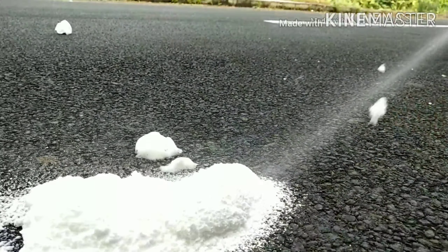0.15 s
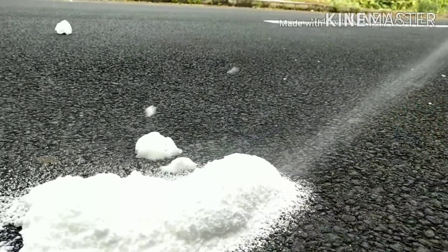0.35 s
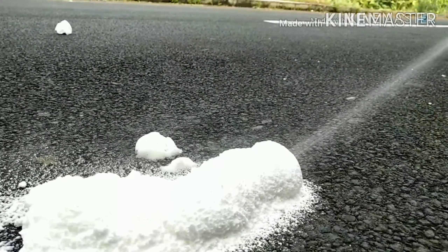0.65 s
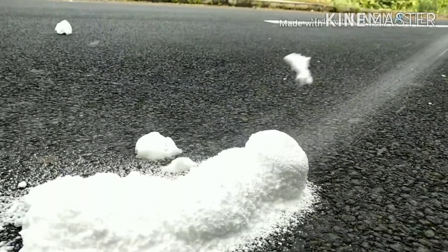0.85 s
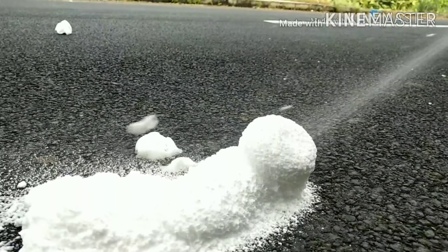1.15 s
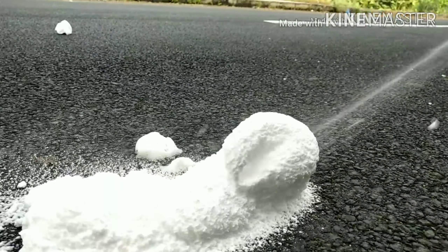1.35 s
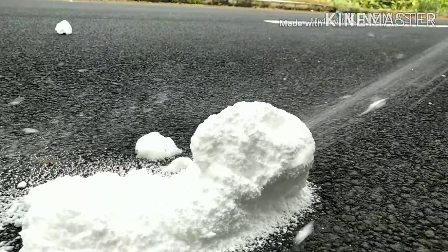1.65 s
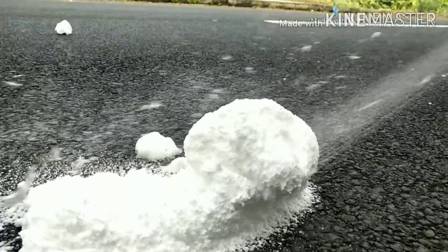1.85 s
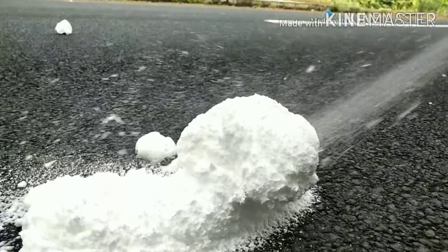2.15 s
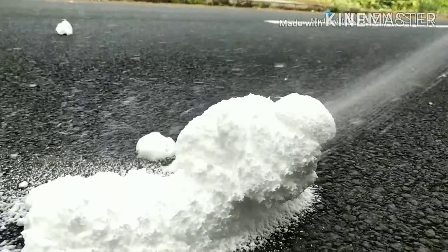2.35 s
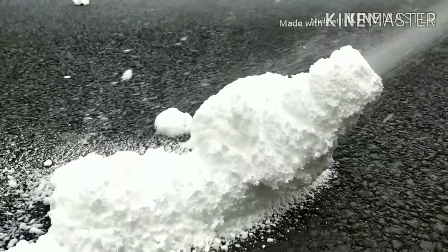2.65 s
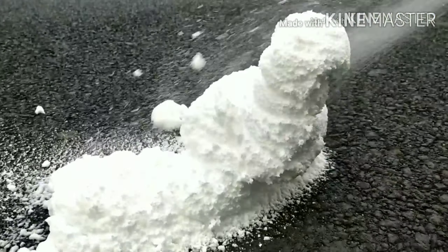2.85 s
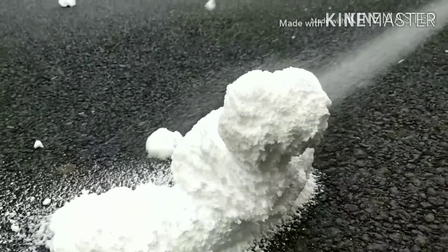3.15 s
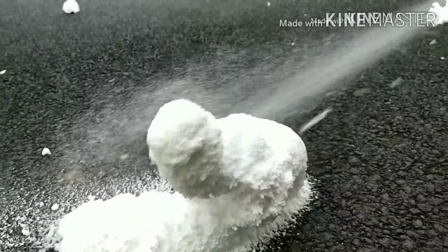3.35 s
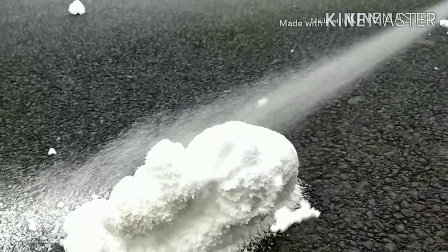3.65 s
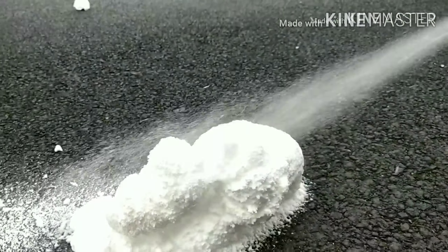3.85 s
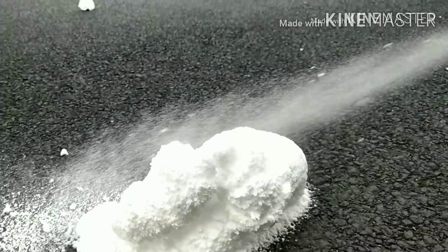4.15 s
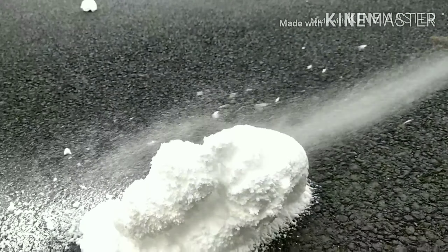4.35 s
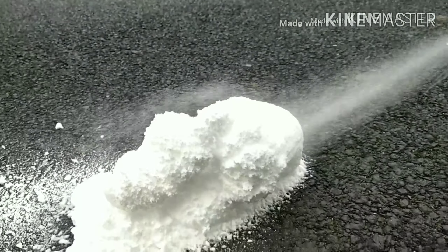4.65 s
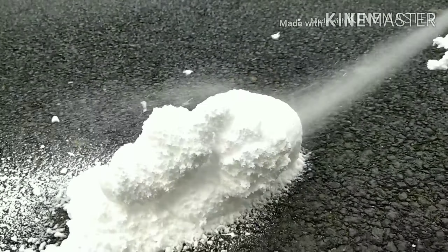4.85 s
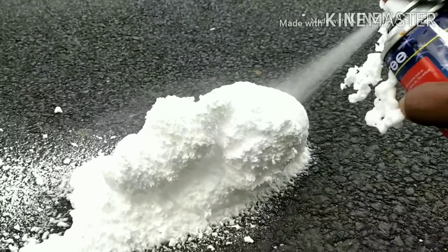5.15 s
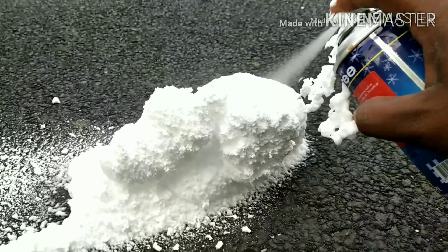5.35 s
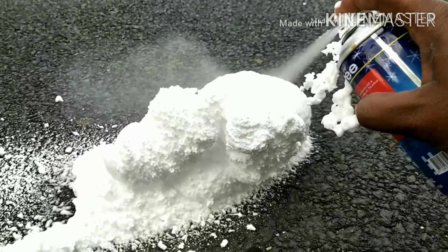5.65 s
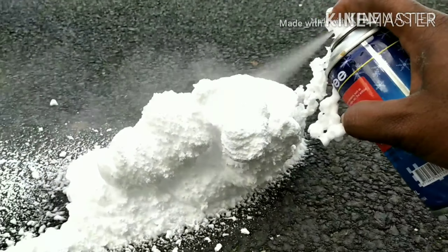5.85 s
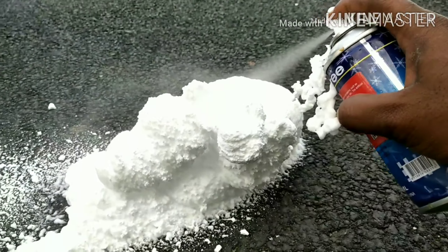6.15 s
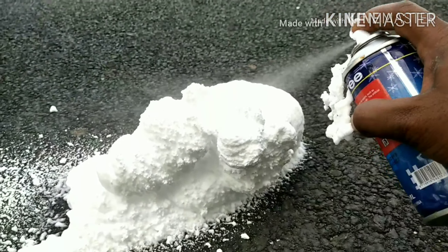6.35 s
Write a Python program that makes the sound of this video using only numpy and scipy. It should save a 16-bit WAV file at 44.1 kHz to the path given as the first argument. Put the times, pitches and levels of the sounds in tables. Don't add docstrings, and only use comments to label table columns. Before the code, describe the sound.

Close outdoor pickup of an aerosol can spraying foam onto a road. For two seconds the jet bores into the heap with a hollow, bubbling roar, quick gulps and wet splashes, stuttering near the end. Then it skims the top and becomes a smooth, bright, piercing hiss with soft airy mist. Distant traffic rumbles low throughout, and the hiss holds to the end.

```python
import sys
import numpy as np
from scipy import signal
from scipy.io import wavfile
from scipy.ndimage import uniform_filter1d

SR = 44100
rng = np.random.default_rng(int(sys.argv[2]) if len(sys.argv) > 2 else 0)


def generate_wav(sig):
    pcm = np.round(np.clip(np.atleast_2d(sig).T, -1, 1) * 32767).astype(np.int16)
    wavfile.write(sys.argv[1], SR, pcm)


def to_linear_factor(level_db):
    exponent = np.asarray(level_db, float) / 20
    return 10 ** exponent


N = 287022
SIZE, HOP = 1024, 256
HZ = np.fft.rfftfreq(SIZE, 1 / SR)[:, None]
T = np.arange(N // HOP + 2) * HOP / SR

# time in seconds, bite in dB.
BITE = [(0, -5), (.22, -3.5), (1.1, 3.5), (1.8, 3), (2.12, 4.5), (2.36, -8.5), (2.55, -20), (2.7, -18.5),
        (2.9, -25.5), (3.08, -43), (3.2, -36.5), (3.36, -48), (3.62, -60), (3.9, -95)]
# level at full bite in dB, bite lost before it fades in dB, share of further loss.
IMPACT_LAYERS = [
    (-20.5, -0.5, 0.92),
    (-24, 10.5, 0.52),
    (-21.5, 16, 0.47),
]
# time in seconds, half length in seconds, bite lost in dB, hiss freed in dB.
SLIPS = [
    (1.24, 0.072, 9.5, -1),
    (1.467, 0.059, 12.5, 3.5),
    (1.592, 0.052, 7, 5),
    (1.766, 0.043, -5, -6),
    (1.916, 0.059, 23, 7),
    (2.017, 0.046, 12.5, -5),
    (2.082, 0.069, 3.5, -12),
    (2.221, 0.056, 16.5, 4.5),
    (2.32, .03, 0.5, -2),
    (2.67, 0.093, -1, -5.5),
]
# time in seconds, half length in seconds, splash in dB.
SPLASHES = [
    (.1, 0.12, 2.5),
    (1.17, 0.078, 2.5),
    (1.965, 0.025, 6.5),
    (2.04, 0.013, 5.5),
    (2.11, 0.045, 5),
    (2.3, .04, 1.5),
    (2.41, .04, 2.5),
    (2.65, 0.089, 4),
]
# time in seconds, half length in seconds, spatter in dB.
LAST_GRAZE = [
    (3.22, 0.15, 5.5),
]
# start in seconds, peak in dB.
GULPS = [(0.102, -9), (0.171, -11), (0.208, -1), (0.253, 0), (0.317, 7), (0.399, -18), (0.436, -6),
         (0.493, -4), (0.562, 1), (0.614, -10), (0.678, -4), (0.752, -7.5), (0.884, -7), (0.968, -15),
         (1.032, -21), (1.172, -5), (1.247, 8.5), (1.344, -20), (1.415, -14), (1.611, -13), (1.674, -10),
         (1.724, -8), (2.085, -14), (2.16, -16)]
# time in seconds, delay in ms, strength 0-1.
LIP = [
    (2.3, 1.45, 0),
    (2.45, 1.52, .55),
    (2.82, 1.54, .6),
    (3.0, 1.58, .15),
]
# frequency in Hz, level in dB per Hz.
CHURN_COLOUR = [(900, -15), (1300, -2.5), (1700, 1.5), (2400, -2), (3200, -15), (4500, -10)]
# frequency in Hz, level in dB per Hz.
SPATTER_COLOUR = [(1700, -8), (2800, -0.5), (4200, -1), (6200, -3), (7600, -5), (9000, -21), (12000, -15.5),
                  (15500, -30)]


def impact():
    bite_db = columns(BITE)[0] - bumps((s, half, lost) for s, half, lost, _ in SLIPS)
    roar_db, churn_db, spatter_db = (
        db + share * np.minimum(bite_db + spare, 3) for db, spare, share in IMPACT_LAYERS)
    freed_db = bumps((s, half, freed) for s, half, _, freed in SLIPS)
    splash_db = bumps(SPLASHES)
    churn_db = churn_db + splash_db
    spatter_db = spatter_db + 1.5 + splash_db + 0.49 * freed_db + bumps(LAST_GRAZE)

    wall = [(s, 1.6 * 1000 / first_hz, .28) for s, first_hz, *_ in DEPTH]
    walls = echo(wall, -1.1) * echo(LIP, -1.2)
    lip_ring_db = 10 * columns(LIP)[1] * np.exp(-((HZ - 1660) / 170) ** 2)
    walls = walls * to_linear_factor(lip_ring_db)

    boil = flutter(9.6, 45)
    gulp_s = .011
    gulp_rows = ((s + gulp_s, gulp_s, .55 * (peak_db + 18)) for s, peak_db in GULPS)
    gulp_db = bumps(gulp_rows, np.arange(N) / SR)
    roar = noise(*tilted(crater(110), 1250, 40, roar_db, -1), 1.6) * to_linear_factor(1.4 * boil + gulp_db)
    churn = noise(colour(CHURN_COLOUR) * walls, churn_db, 1.34) * to_linear_factor(0.91 * boil)
    spatter = noise(colour(SPATTER_COLOUR), spatter_db, 1.3) * to_linear_factor(0.29 * boil)
    return (roar + churn) * sputter(60, 0.97, 2.5) + spatter * sputter(170, 4.1, 0.6)


# time in seconds, lowest air mode in Hz, mode step in Hz, most excited pitch in Hz.
DEPTH = [
    (0, 824, 247, 1300),
    (.28, 850, 307, 790),
    (.5, 752, 367, 900),
    (.72, 633, 425, 684),
    (.95, 630, 414, 1000),
    (1.15, 590, 370, 970),
    (1.38, 563, 295, 980),
    (1.7, 573, 310, 895),
    (2.1, 527, 297, 1000),
    (2.5, 448, 268, 1490),
]
# frequency in Hz, level in dB per Hz.
CRATER_WASH = [(280, -40), (420, -22), (600, -12), (1000, -10), (1500, -12), (2100, -35)]
# time in seconds, half length in seconds, boost in dB.
OPENINGS = [
    (0, 0.31, 22),
    (1.5, 0.062, 26),
    (1.75, 0.32, 18.5),
    (2.09, 0.11, 20),
]


def crater(width_hz):
    first_hz, step_hz, excited_hz = columns(DEPTH)
    power = 0
    for hz in first_hz + np.arange(4)[:, None] * step_hz:
        peak_db = 7.5 - 17.5 * np.log2(hz / excited_hz) ** 2
        power = power + to_linear_factor(peak_db) ** 2 / (1 + (2 * (HZ - hz) / width_hz) ** 2) ** 2
    opened_db = bumps(OPENINGS) / (1 + (HZ / 477) ** 4)
    return np.sqrt(power + (colour(CRATER_WASH) * to_linear_factor(opened_db)) ** 2)


# time in seconds, hiss in dB, top octave against it in dB.
NOZZLE = [(0, -25, -5), (.4, -24.5, -9.5), (.8, -23.5, -7.5), (1.1, -28, -14), (1.36, -35.5, 1),
          (1.75, -29.5, 2), (2.08, -23, -5), (2.2, -23, -4), (2.5, -17, -5), (2.7, -10.5, -6.5),
          (2.8, -17, -2), (3.3, -14.5, -7.5), (3.57, -14, -8.5), (3.9, -16.5, -3.5), (4.5, -17.5, 0),
          (4.8, -19, 2), (5.5, -18, 3), (6.51, -20, 3)]
# frequency in Hz, level in dB per Hz.
HISS_COLOUR = [(4000, -35), (6000, -9.5), (7400, -0.5), (8300, 2), (9400, -2), (10800, 2.5), (11600, 0),
               (12400, 1.5), (13600, 3), (14600, -3), (15600, -7), (16500, -40)]


def nozzle():
    heap_s, hand_s, turn_s = 1.0, 5.47, 5.2
    low_hz = 7480 - 1300 * (columns(ROAD)[0] - .75) - bumps([(4.0, 0.49, 250), (2.9, 0.26, -200)])
    shade = 1 / np.sqrt(1 + (low_hz / (HZ + 1)) ** 18.0)
    valley_db = bumps([(4.0, .9, -1), (5.55, .2, 3.3)])
    valley = to_linear_factor(-valley_db * np.exp(-((HZ - 9500) / 600) ** 2))
    shoulder_hz = 13630 - bumps([(heap_s, .6, 2200), (hand_s, .2, 500), (turn_s + 0.22, .5, 800)])
    drop_db = 6.5 + bumps([(heap_s, .6, 5), (turn_s, .7, 3), (6.2, .12, 4), (3.0, .12, 4)])
    shoulder = to_linear_factor(-drop_db / (1 + np.exp((shoulder_hz - HZ) / 420)))

    hiss_db, top_db = columns(NOZZLE)
    hiss_db = hiss_db + bumps((s, half, freed) for s, half, _, freed in SLIPS)
    body = colour(HISS_COLOUR) * shade * valley * shoulder * road()
    hiss = noise(*tilted(body, 10080, 490, hiss_db, top_db - .6), 0.77)
    return hiss * to_linear_factor(0.37 * flutter(4, 60)) * sputter(170, .6, 0.69)


# time in seconds, delay in ms, strength 0-1.
ROAD = [(1.9, .83, .15), (2.16, .75, .17), (2.7, .738, .16), (3.0, .714, .19), (3.4, .8, .26),
        (3.75, .924, .3), (3.96, .911, .28), (4.25, .874, .2), (4.68, .885, .18), (4.86, .935, .17),
        (5.16, 1.086, .17), (5.64, 1.234, .15), (5.9, 1.226, .17), (6.15, 1.232, .14), (6.5, 1.268, .19)]
# frequency in Hz, factor on the echo.
LOBES = [(1200, 0), (2200, -1.4), (3400, -1.5), (4600, .3), (5600, 1.1), (6300, -1.8), (7000, -1.8),
         (8200, 0), (9400, 1.4), (10600, 1.9), (11800, 2.2), (13000, 1.1), (14500, .2)]


def road():
    return echo(ROAD, .85 * np.interp(HZ, *np.transpose(LOBES)))


# time in seconds, level in dB.
MIST = [
    (2.2, -60),
    (2.6, -45),
    (3.1, -39.5),
    (3.7, -37.5),
    (4.4, -36),
    (5.6, -36.5),
    (6.15, -35),
    (6.51, -32),
]
# frequency in Hz, level in dB per Hz.
MIST_COLOUR = [(160, -22), (300, -4), (700, -1.5), (1200, -1.5), (2200, -0.5), (3500, -0.5), (5000, -4),
               (6600, -1), (8000, -44)]


def mist():
    mist_db = columns(MIST)[0]
    top_db = np.minimum(0.23 * (-40.5 - mist_db), 6)
    shape = tilted(colour(MIST_COLOUR) * road(), 1800, 200, mist_db, top_db)
    return noise(*shape, 1.5) * to_linear_factor(0.65 * flutter(2.4, 60)) * sputter(90, 0.49, 0.44)


# time in seconds, half length in seconds, depth in dB.
GAPS = [
    (3.7, 0.63, 1.5),
    (4.4, 1, 5),
    (5.0, 0.12, -1),
    (5.4, .2, 2),
]
# time in seconds, half length in seconds, frequency in Hz,
# depth in dB.
HOLES = [
    (4.53, .04, 5900, 16),
    (5.0, .08, 5900, 7),
    (5.19, .03, 4900, 13),
    (5.31, .04, 4800, 15),
    (5.44, .025, 4950, 10),
    (6.32, .04, 5300, 9),
]
# time in seconds, frequency in Hz, depth in dB.
FINGERS = [
    (5.0, 15300, -3),
    (5.3, 14600, 6),
    (5.6, 13800, 7),
    (5.9, 14200, 3),
    (6.25, 13700, 5),
    (6.33, 13900, 4),
]


def gap():
    gap_hz = 5660 - bumps([(5.47, .25, 900)])
    gap_db = bumps(GAPS) * np.exp(-((HZ - gap_hz) / 490) ** 2)
    holes_db = sum(bumps([(s, half, db)]) * np.exp(-((HZ - hz) / 280) ** 2) for s, half, hz, db in HOLES)
    finger_hz, finger_db = columns(FINGERS)
    notch_db = finger_db * np.exp(-((HZ - finger_hz) / 500) ** 2)
    return to_linear_factor(-gap_db - holes_db - notch_db)


# time in seconds, half length in seconds, change in dB.
PASSES = [(.06, 0.14, 6), (.29, 0.11, 7), (.72, 0.14, 8), (1.58, 0.074, 8), (1.82, .06, -1),
          (2.05, .12, -9), (2.26, 0.035, 8), (2.55, .05, 6), (2.9, 0.59, -8.5), (4.1, 0.47, 4),
          (4.6, 0.12, 2), (4.83, 0.07, 11.5), (5.07, 0.061, 4), (5.28, 0.089, 5), (5.48, .08, 2),
          (5.98, 0.051, 4), (6.3, 0.16, 6)]
# time in seconds, half length in seconds, rise in dB.
NEAR_TYRES = [
    (5.4, 0.32, 4.5),
    (6.05, 0.37, 9.5),
]
# frequency in Hz, level in dB per Hz.
RUMBLE_COLOUR = [(24, -45), (38, 1.5), (58, 4.5), (75, 6.5), (110, -12), (170, -9)]
# frequency in Hz, level in dB per Hz.
DRONE_COLOUR = [(90, -34), (140, 3.5), (220, -3), (290, -6.5), (370, -1.5), (520, -18)]


def traffic():
    swell_db = bumps(PASSES)
    rumble = noise(colour(RUMBLE_COLOUR), -39.5 + swell_db, 0.53)
    drone_db = -46 + 0.24 * swell_db + bumps(NEAR_TYRES)
    drone = noise(colour(DRONE_COLOUR), drone_db, 1.6)
    engine_hz = 59.4 * (1 + 0.097 * flutter(.5, 9.2))
    engine_db = -45.5 + bumps(PASSES, np.arange(N) / SR) + 2.7 * flutter(4.3, 17)
    engine = np.sin(2 * np.pi * np.cumsum(engine_hz) / SR) * to_linear_factor(engine_db)
    return rumble + drone + engine


def noise(gain, db, patchy_db):
    a, b, patches = rng.standard_normal((len(T), len(HZ), 3)).T
    patches = uniform_filter1d(patches, size=10, axis=0)
    patches = evened(uniform_filter1d(patches, size=12, axis=1))
    gain = gain * to_linear_factor(db + patchy_db * patches) / np.sqrt((gain ** 2).sum(0))
    unit = np.sqrt(SIZE / HOP * 3 / 8)
    return unit * signal.istft((a + 1j * b) * gain, nperseg=SIZE, noverlap=SIZE - HOP)[1][:N]


def sputter(per_s, spread_db, ms):
    size_db = spread_db * np.minimum(rng.exponential(1, N), 4)
    clots = (rng.random(N) < per_s / SR) * to_linear_factor(size_db)
    t = np.arange(2000) / SR
    burst = np.exp(-t * 1000 / ms) * (1 - np.exp(-t * 3000))
    return evened(1 + signal.oaconvolve(clots, burst)[:N])


def flutter(lo_hz, hi_hz):
    hz = np.geomspace(lo_hz, hi_hz, 40)[:, None]
    waves = np.sin(2 * np.pi * (hz * T + rng.random((40, 1)))) / np.sqrt(hz)
    return np.interp(np.arange(N) / SR, T, evened(waves.sum(0)))


def echo(rows, factor):
    ms, share = columns(rows)
    share = np.clip(factor * share, -.95, .95)
    comb = abs(1 + share * np.exp(-2j * np.pi * HZ * ms / 1000))
    return comb / np.sqrt(1 + share ** 2)


def tilted(body, turn_hz, slope_hz, low_db, top_db):
    upper = 1 / (1 + np.exp((turn_hz - HZ) / slope_hz))
    gain = body * to_linear_factor(upper * top_db) / np.sqrt((body ** 2 * (1 - upper)).sum(0))
    return gain, low_db + 10 * np.log10((gain ** 2).sum(0))


def colour(points):
    f, db = np.transpose(points)
    return to_linear_factor(np.interp(np.log(HZ + 1), np.log(f), db, -70, -70))


def bumps(rows, t=T):
    return sum(height * np.exp(-((t - s) / half) ** 2) for s, half, height in rows)


def columns(rows, t=T):
    s, *values = np.transpose(rows)
    return [np.interp(t, s, v) for v in values]


def evened(x):
    return x / np.sqrt(np.mean(x ** 2) + 1e-20)


def scene():
    z = signal.stft(impact() + nozzle() + mist(), nperseg=SIZE, noverlap=SIZE - HOP)[2]
    spray = signal.istft(z * gap()[:, :z.shape[1]], nperseg=SIZE, noverlap=SIZE - HOP)[1][:N]
    return (spray + traffic())[None]


def top_cut(x):
    return signal.sosfilt(signal.butter(12, 15520, fs=SR, output="sos"), x)


def record(dry):
    power_db = 10 * np.log10(abs(uniform_filter1d(dry ** 2, size=900)) + 1e-12)
    surge_db = power_db - uniform_filter1d(power_db, size=9000)
    level = dry / to_linear_factor(0.55 * surge_db)
    rounded = level / (1 + (level / .8) ** 16) ** (1 / 16)
    thin = signal.sosfilt(signal.butter(4, 42, "high", fs=SR, output="sos"), rounded)
    lowpass = signal.firwin(511, 15640, window=("kaiser", 9), fs=SR)
    limited = signal.oaconvolve(thin, lowpass[None], "same")
    return top_cut(limited)


dry = scene()
out = record(dry)
generate_wav(out)
```